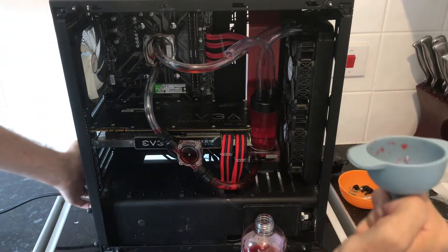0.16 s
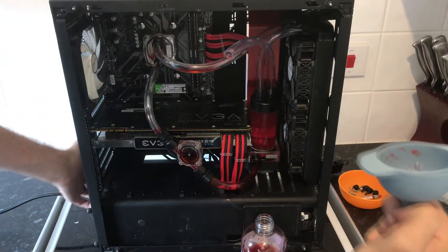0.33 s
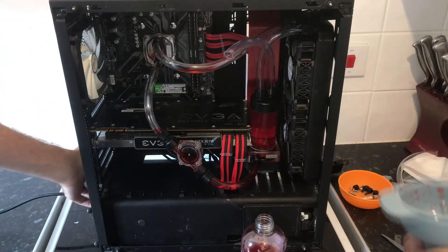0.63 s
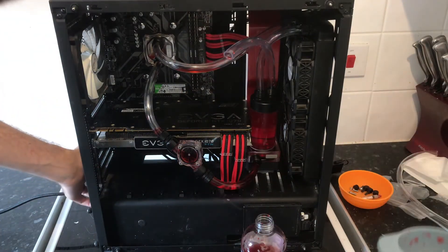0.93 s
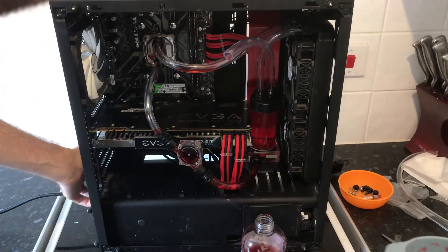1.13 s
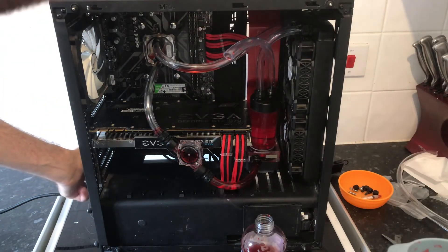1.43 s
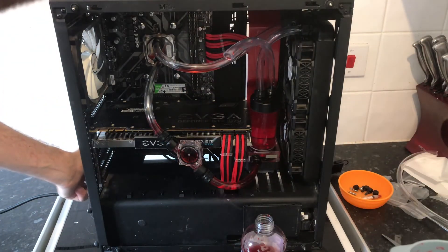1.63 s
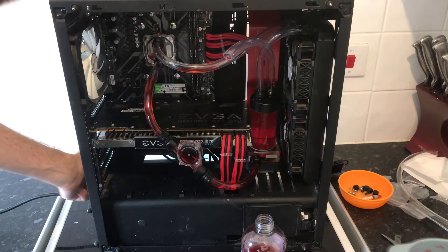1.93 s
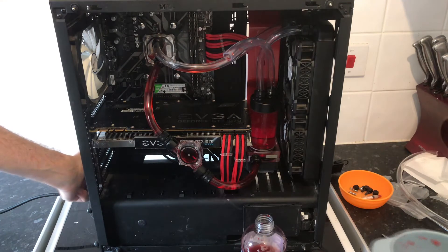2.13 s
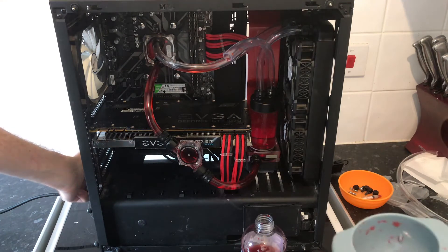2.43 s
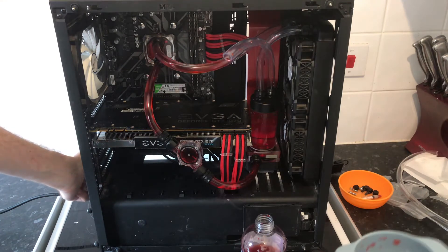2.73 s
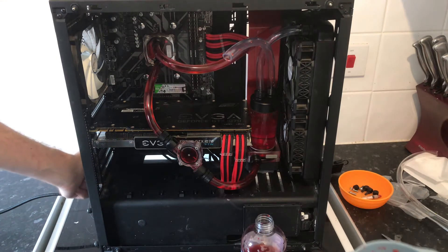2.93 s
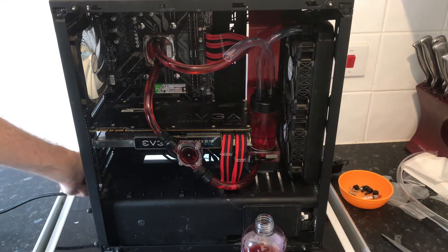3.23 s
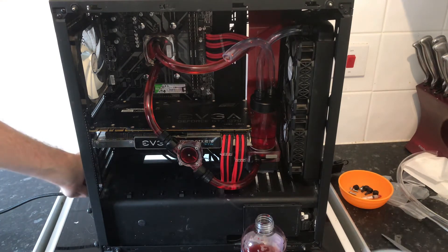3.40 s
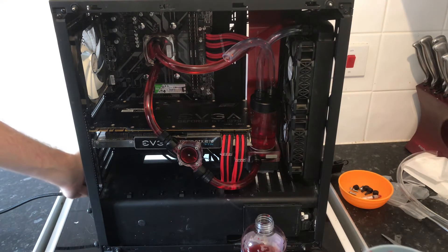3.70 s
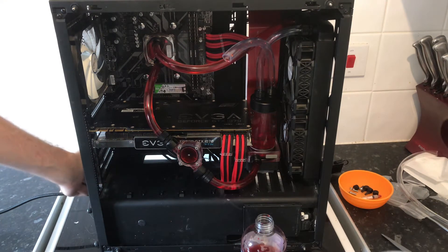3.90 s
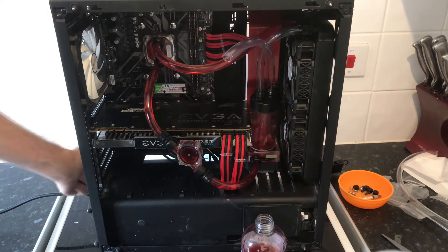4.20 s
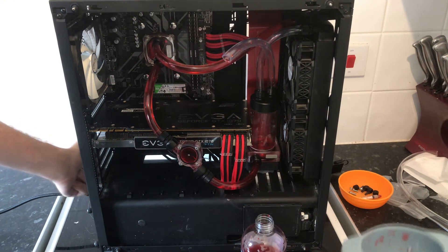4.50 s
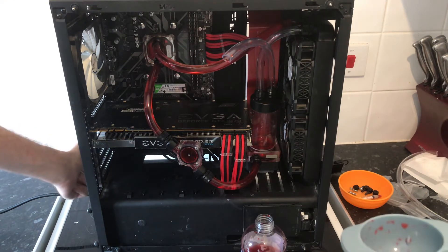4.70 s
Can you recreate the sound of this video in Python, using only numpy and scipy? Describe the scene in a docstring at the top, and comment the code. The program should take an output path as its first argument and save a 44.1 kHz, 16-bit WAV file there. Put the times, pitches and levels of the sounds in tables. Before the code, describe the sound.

A rocker switch snaps on right at the start, over a faint, low background noise in a tiled kitchen with a short echo. From about 0.3 to 1.6 seconds, light knocks and ticks sound on a steel computer case. At 1.4 seconds a small pump starts with a brief rising hum and a faint, thin, high whine that carries on. From around 2 seconds, coolant and air churn through the tubes, a fizzy bubbling that grows steadily louder, with a soft hollow gurgle in the reservoir and scattered small pops of air pockets. At 4 seconds the switch snaps off, the case takes one more bump and the whine stops. The flow surges with a hiss at about 4.2 seconds, then fizzes out by 4.6 seconds, leaving two tiny last pops.

```python
"""A computer's water-cooling loop is primed on a kitchen counter. The power switch snaps on; bumps
ring the steel case. The pump spins up with a hum and a thin whine, then churns air and coolant
through the tubes into the gurgling reservoir, while air pockets pop. The switch snaps off, the
case takes one more bump, and the flow surges and fizzes out. The tiled room reverberates throughout."""
import sys
import numpy as np
from scipy import signal
from scipy.fft import rfft, irfft, next_fast_len
from scipy.io import wavfile
from scipy.ndimage import map_coordinates

SR = 44100
rng = np.random.default_rng(int(sys.argv[2]) if len(sys.argv) > 2 else 0)


def log_audio(samples):
    """Write samples as a 16-bit WAV file to the path given in sys.argv[1]."""
    # one column per channel
    frames = np.atleast_2d(samples).T
    # limit to full scale, then quantise
    limited = np.clip(frames, -1, 1)
    pcm = np.round(limited * 32767).astype(np.int16)
    wavfile.write(sys.argv[1], SR, pcm)


N = 213976

# Flow as the loop fills, surges and runs down. Each row: time in seconds, strength in dB.
FLOW_STRENGTH = [(1.75, -69), (1.95, -67.0), (2.05, -57), (2.27, -53.5), (2.37, -58), (2.48, -49.5),
                 (2.719, -47), (3.05, -45.5), (3.4, -44), (3.88, -42.5), (4.13, -40.5), (4.2, -37),
                 (4.33, -39.5), (4.47, -41), (4.6, -59), (4.73, -63.5)]
# Impeller bubbles, fine spray, last air squeezed through. Each row: frequency in Hz, relative gain in dB.
CHURN_SPECTRUM = [(410, -26), (700, -4), (776, -16), (960, -10), (1050, -9), (1130, -9), (1360, -10.5),
                  (1870, -2.5), (2110, -2.5), (2590, -7.5), (2990, 1), (3840, -5), (4510, -1.5),
                  (5000, -12.5), (5400, -16.5), (7020, -36), (11900, -120)]
SPRAY_SPECTRUM = [(4600, -26), (5300, -4.5), (6050, -3), (7000, -5.5), (7900, -11), (9100, -8.5),
                  (10200, -13), (12000, -14.5), (15800, -21.5)]
HISS_SPECTRUM = [(4000, -30), (5400, 2), (6400, 3.5), (7100, -5), (7900, -33)]
# Bursting air pockets. Each row: start in seconds, ring in relative dB, pitch in Hz, crack in relative dB.
POCKET_POPS = [(2.0178, -45.5, 3440, -53), (2.1365, -32.5, 2080, -61), (2.231, -41, 4440, -48),
               (2.4428, -39, 2200, -49.5), (2.4982, -36, 1610, -48.5), (2.5327, -32, 2940, -46),
               (2.6823, -38, 2340, -45), (2.7526, -32.5, 2090, -41), (2.8765, -34, 3140, -49),
               (2.9225, -40, 4540, -41.5), (3.0105, -29, 2900, -44), (3.3602, -25.5, 3128, -42.5),
               (3.7753, -40, 2930, -41.5), (4.2025, -30, 2130, -37.5), (4.6594, -47, 3700, -59.5),
               (4.761, -40, 3680, -55.5)]
# Rocker switch snaps. Each row: frequency in Hz, relative gain in dB.
ON_SPECTRUM = [(90, -30), (160, -15), (300, -27.5), (580, -22.5), (1130, -12), (1500, -16), (2000, -16),
               (3700, -8.5), (4600, -11), (5500, 0.5), (6500, 0), (7600, -8.5), (10700, -14), (15500, -17)]
OFF_SPECTRUM = [(150, -32), (400, -31), (800, -12), (1130, -7.5), (1500, -16.5), (2300, -8.5), (2950, 1.5),
                (3700, -0.5), (5300, -2), (7500, -5.5), (9000, -10.5), (10700, -18), (15500, -19)]
# Case bumps. Each row: start in seconds, ring in relative dB, tick in relative dB, panel pitch in Hz.
CASE_BUMPS = [(.315, -58, -59.5, 1200), (.493, -48.5, -47.5, 1195), (.706, -49, -41, 1210),
              (.742, -47.5, -64, 1260), (0.767, -47, -65, 1200), (1.24, -46.5, -52.5, 1395),
              (1.275, -46, -57, 1285), (1.406, -48, -49, 1280), (1.424, -56, -42, 463),
              (1.639, -62, -52.5, 2150), (4.023, -39, -48, 1251)]
# Resonances shared by all panels. Each row: frequency in Hz, width in Hz, relative gain in dB.
CASE_MODES = [(192.7, 90, -10.5), (405, 270, -15), (690, 136, -5.5), (1880, 160, -13.5), (2780, 120, -17.5)]
# Contact tick and room tone. Each row: frequency in Hz, relative gain in dB.
TICK_SPECTRUM = [(300, -9), (1000, -5), (2400, 3.5), (4600, -3), (6200, 1.5), (8000, -18), (15000, -21)]
ROOM_TONE_SPECTRUM = [(20, -7.5), (32, -3.5), (45, -5), (80, -2), (125, -7), (380, -9.5), (550, -12),
                      (1250, -16.5), (1600, -20), (2500, -21), (4000, -24), (9300, -29), (15800, -34.5)]
# Kitchen reverberation. Each row: frequency in Hz, 60 dB decay time in seconds.
KITCHEN_T60 = [(150, 0.51), (500, 0.33), (2700, 0.33), (6300, 0.31), (10000, .26), (15000, 0.23)]

SWITCH_ON_S, PUMP_ON_S, SWITCH_OFF_S = .0711, 1.41, 4.0046
COAST_S, COAST_RISE_S = 4.206, .17
FULL_FLOW_DB = -44  # reference for flow strength


def flow():
    """The impeller chops air into bubbles: stronger flow, denser swarm. Coasting adds a hiss."""
    flow_db = curves([(PUMP_ON_S, -100), *FLOW_STRENGTH])[0] - FULL_FLOW_DB
    coast = ramp(COAST_S, COAST_RISE_S)
    rate_per_s = 350 + 5000 * amp(flow_db) ** 1.4
    surge_db = 1.1 * wobble(40)
    coarse = bubbles(rate_per_s, 562, 6000, cycles=3.4, spread_db=3.5) + .35 * noise()
    fine = bubbles(rate_per_s, 4500, 15800, cycles=3.3, spread_db=3.5) + .35 * noise()
    last_air = bubbles(rate_per_s, 4000, 8000, cycles=5, spread_db=4)
    churn = amp(-48.5 + flow_db) * unit(filtered(coarse, colour(CHURN_SPECTRUM)))
    fizz = amp(-54.5) * unit(filtered(fine, colour(SPRAY_SPECTRUM)))
    hiss = amp(-51.5) * coast * unit(filtered(last_air, colour(HISS_SPECTRUM)))
    water = amp(surge_db) * (churn + amp(1.02 * flow_db) * (fizz + hiss))
    hollow = amp(-63) * tube_rumble() + amp(-55) * gurgle()
    return room(water, wet_db=-5) + amp(.68 * flow_db - 5.5 * coast) * hollow


def bubbles(rate_per_s, low_hz, high_hz, cycles, spread_db):
    """Each bubble rings briefly with rising pitch; the swarm has rms 1."""
    starts = np.flatnonzero(rng.random(N) < rate_per_s / SR)
    pitch, chance, life = rng.random((len(starts), 3)).T[:, :, None]
    hz = low_hz + (high_hz - low_hz) * pitch
    size = amp(-spread_db * np.log(np.maximum(chance, np.exp(-4))))  # many small, few large
    k = np.arange(int(min(SR // 160, 4 * cycles * SR / low_hz)))
    turns = hz * k / SR
    age = turns / (cycles * (.5 + life))
    rise = 1 + .027 * np.minimum(age, 2)
    rings = size * np.sqrt(hz) * np.exp(-age) * np.sin(2 * np.pi * turns * rise)
    swarm = np.bincount((starts[:, None] + k).ravel(), rings.ravel(), N)[:N]
    return unit(swarm / np.sqrt(rate_per_s))


def pops(ring_t60_s=.018, attack_s=.0015):
    """Larger air pockets burst in the pump: a crack and a brief rising ring."""
    rings, cracks, t = np.zeros(N), np.zeros(N), np.arange(SR // 20) / SR
    envelope = amp(-60 * t / ring_t60_s) * (1 - np.exp(-t / attack_s))
    for s, ring_db, hz, crack_db in POCKET_POPS:
        add(rings, s, amp(ring_db + .5) * envelope * np.sin(2 * np.pi * hz * t * (1 + 5 * t)))
        add(cracks, s, amp(crack_db + 3.5) * burst(t60_s=.03))
    crack_colour = colour([(400, -9), (1800, -8.5), (4500, 3.5), (7000, -3), (9000, -14.5), (15000, -27)])
    return room(rings, wet_db=-3.5) + room(filtered(cracks, crack_colour), wet_db=-3.5)


def gurgle(pocket_hz=574, sink_hz_per_s=20, width_hz=34, scatter_hz=15, rebound_s=4.13):
    """Inflow nudges the reservoir's air pocket; its two notes sink as the loop fills, then spring back."""
    def note(hz):
        nudges = rng.choice([-1, 1], N) * (rng.random(N) < 900 / SR)
        phasor = np.exp(2j * np.pi * np.cumsum(hz + scatter_hz * wobble(70)) / SR)
        ring = signal.lfilter([1], [1, -np.exp(-np.pi * width_hz / SR)], nudges / phasor)
        return unit((ring * phasor).imag)
    filled_s = since(PUMP_ON_S) * (1 - ramp(rebound_s, .12))
    hz = pocket_hz - sink_hz_per_s * filled_s
    overtone_db = -1 - 2 * filled_s  # fuller loop, purer note
    return unit(note(hz) + amp(overtone_db) * note(1.2 * hz))


def tube_rumble():
    """Low rush of coolant in the tubes."""
    spectrum = [(30, -22.5), (90, 4.5), (140, -4.5), (300, -5.5), (450, -2.5), (1000, -9.5), (2000, -37)]
    return filtered(noise(), colour(spectrum))


def pump(start_hz=146.3, full_hz=253, spin_up_s=.12, attack_s=.14, hold_s=.073, coast_hz=296.8):
    """The rotor hums up to speed, is muted as liquid loads it, and hums faintly as it coasts."""
    hz = full_hz - (full_hz - start_hz) * np.exp(-since(PUMP_ON_S) / spin_up_s)
    fade_db = 130 * since(PUMP_ON_S + attack_s + hold_s)
    starting = amp(-52.5 - fade_db) * ramp(PUMP_ON_S, attack_s) * hum(hz)
    coast_gate = ramp(COAST_S, .028) * (1 - ramp(COAST_S + COAST_RISE_S, .25))
    coasting = amp(-63.5) * coast_gate * hum(np.full(N, coast_hz))
    return room(starting + coasting, wet_db=-8)


def hum(hz):
    """The rotor's shuddering note."""
    shudder = 1 + .35 * wobble(80)
    return shudder * np.sin(2 * np.pi * np.cumsum(hz) / SR + .52 * wobble(60))


def whine(hz=7680, swell_s=.3, swell_db=8, fade_db_per_s=2):
    """Motor drive tone with octave and noise skirt: swells, then fades slowly until power is cut."""
    start_s = PUMP_ON_S + .05
    powered = ramp(start_s, .01) * (1 - ramp(SWITCH_OFF_S, .05))
    db = -65 - swell_db * (1 - ramp(start_s, swell_s)) - fade_db_per_s * since(start_s + swell_s)
    phase = 2 * np.pi * np.cumsum(hz + 14 * wobble(24)) / SR
    drive = np.sin(phase) + amp(-11) * np.sin(2 * phase + wobble(150))
    skirt = filtered(noise(), body([(7670, 130, 0)]))
    return powered * amp(db + .86 * wobble(20)) * (amp(-1) * drive + amp(-1.5) * skirt)


def switch(start_s, spectrum, travel_s, tip_db, t60_s, wet_db, stop_db=-12):
    """The rocker tips over its spring, then hits its stop; the room carries on the energy of both."""
    x = np.zeros(N)
    add(x, start_s, amp(tip_db) * burst(t60_s))
    add(x, start_s + travel_s, amp(stop_db) * burst(t60_s))
    add(x, start_s + travel_s, amp(wet_db) * np.linalg.norm(x) * room_tail())
    return filtered(x, colour(spectrum))


def bumps():
    """Light contacts tick and set the steel panels ringing."""
    x = np.zeros(N)
    for s, ring_db, tick_db, hz in CASE_BUMPS:
        panel = body(CASE_MODES + [(hz, 80, 3)])
        add(x, s, amp(ring_db + 2.5) * filtered(burst(t60_s=.039), panel))
        add(x, s, amp(tick_db) * filtered(burst(t60_s=.024), colour(TICK_SPECTRUM)))
    return room(x, wet_db=2)


def room(x, wet_db):
    """Direct sound plus kitchen reverberation."""
    return x + amp(wet_db) * signal.fftconvolve(x, room_tail())[:N]


def room_tail(onset_s=.0012):
    """Kitchen reflections of unit energy; each frequency decays at its own rate."""
    hz, t, z = signal.stft(rng.standard_normal(SR * 2 // 3), SR, nperseg=256)
    x = signal.istft(z * amp(-60 * t / along(KITCHEN_T60, hz)[:, None]), SR, nperseg=256)[1]
    x *= 1 - np.exp(-np.arange(len(x)) / SR / onset_s)
    return x / np.linalg.norm(x)


def room_tone():
    """Steady, bass-heavy background noise."""
    return amp(-62.5) * filtered(noise(), colour(ROOM_TONE_SPECTRUM))


def burst(t60_s):
    """A contact: fast-decaying noise."""
    t = np.arange(SR // 8) / SR
    return rng.standard_normal(len(t)) * amp(-60 * t / t60_s)


def filtered(x, response):
    """Apply a frequency response scaled to mean power gain 1."""
    m = 2 * next_fast_len((len(x) + SR // 8) // 2, True)
    h = response(np.fft.rfftfreq(m, 1 / SR))
    return irfft(rfft(x, m) * h / np.sqrt(np.mean(np.abs(h) ** 2)), m)[:len(x)]


def colour(points):
    """Minimum-phase response through (Hz, dB) points."""
    def response(hz):
        cepstrum = irfft(np.log(amp(along(points, hz)) + 1e-6))
        half = len(cepstrum) // 2
        return np.exp(rfft(cepstrum * np.r_[1, np.full(half - 1, 2), 1, np.zeros(half - 1)]))
    return response


def body(modes):
    """Response of (Hz, width in Hz, dB) resonances, alternating in sign."""
    return lambda f: sum((-1) ** k * amp(db) * 1j * f * width / (hz * hz - f * f + 1j * f * width)
                         for k, (hz, width, db) in enumerate(modes))


def along(points, hz):
    """Interpolate (Hz, value) points on a log axis."""
    f, v = np.transpose(points)
    return np.interp(np.log(hz + 1), np.log(f + 1), v)


def curves(rows):
    """One value per sample for each column after the time."""
    s, *cols = np.transpose(rows)
    return [np.interp(np.arange(N) / SR, s, c) for c in cols]


def wobble(knots_per_s):
    """Smooth random curve."""
    knots = rng.standard_normal(int(N * knots_per_s / SR) + 4)
    return map_coordinates(knots, [np.arange(N) * knots_per_s / SR])


def add(track, start_s, sound):
    part = track[round(start_s * SR):][:len(sound)]
    part += sound[:len(part)]


def since(start_s):
    return np.maximum(np.arange(N) / SR - start_s, 0)


def ramp(start_s, length_s):
    return np.clip(since(start_s) / length_s, 0, 1)


def noise():
    return rng.standard_normal(N)


def amp(db):
    return 10 ** (np.asarray(db) / 20)


def unit(x):
    return x / np.sqrt(np.mean(x ** 2) + 1e-20)


def scene():
    """Mono mix of all sources."""
    on = switch(SWITCH_ON_S, ON_SPECTRUM, travel_s=.0029, tip_db=-9.5, t60_s=.013, wet_db=.5)
    off = switch(SWITCH_OFF_S, OFF_SPECTRUM, travel_s=.0015, tip_db=-22, t60_s=.026, wet_db=-.3)
    return (room_tone() + on + off + bumps() + pump() + whine() + flow() + pops())[None]


def record(dry):
    """Brick-wall low-pass."""
    top_hz = 15850
    m = next_fast_len(N + SR // 2)
    return irfft(rfft(dry, m) * (np.fft.rfftfreq(m, 1 / SR) < top_hz), m)[:, :N]


dry = scene()
out = record(dry)
log_audio(out)
```